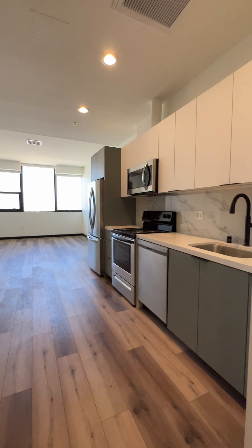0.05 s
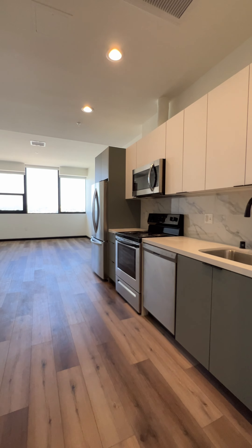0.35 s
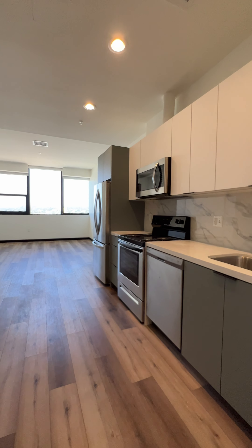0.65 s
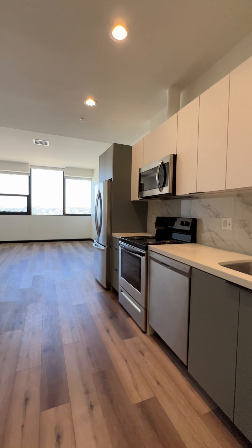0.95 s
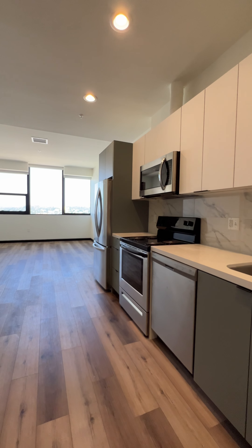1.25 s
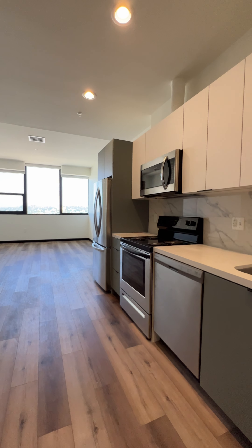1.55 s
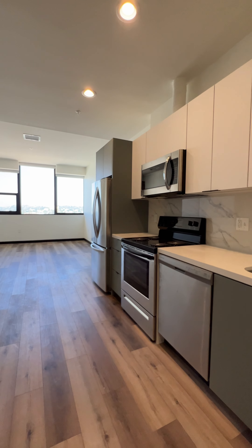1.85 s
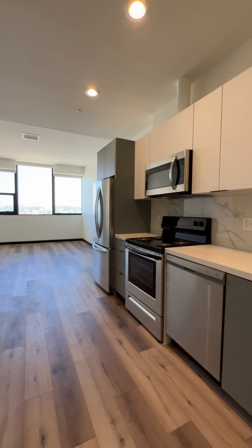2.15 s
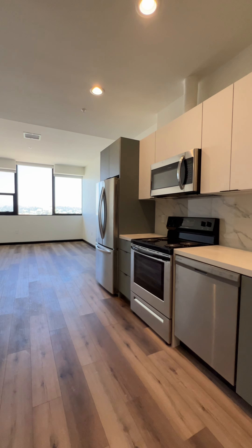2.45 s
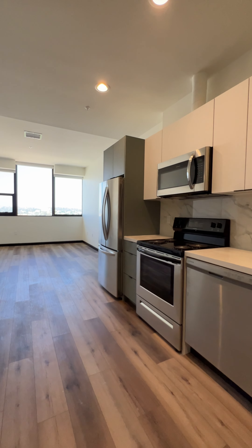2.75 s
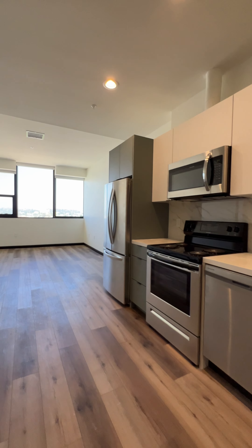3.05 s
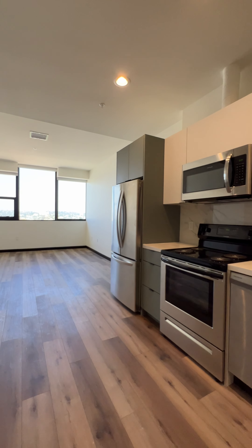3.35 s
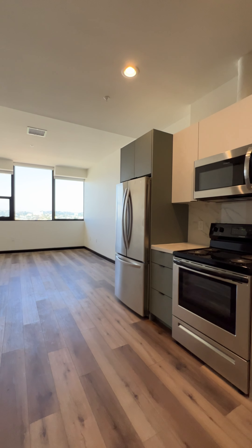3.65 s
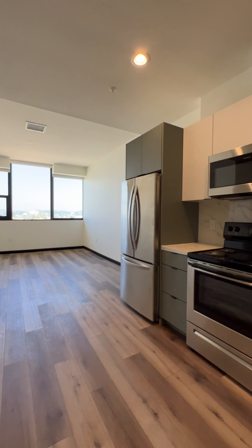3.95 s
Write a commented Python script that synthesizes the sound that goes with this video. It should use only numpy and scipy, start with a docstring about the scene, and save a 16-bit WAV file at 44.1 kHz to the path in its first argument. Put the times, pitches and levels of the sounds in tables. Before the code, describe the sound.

In an empty, echoing apartment, quiet footsteps cross a wooden floor while ventilation hums. Then a door closes loudly, away from the microphone: its panel knocks, the latch scrapes and snaps, and it settles with a thud.

```python
"""Soft footsteps and ticking boards sound in a bare apartment over a low ventilation drone.
Then, out of sight, what is probably a door swings shut: its panel knocks, its latch scrapes
and snaps, and the leaf settles with a boom. Each impact is a brief force, filtered by the struck
body; the door's modes ring on. Hard walls and floor reverberate for over a second after every blow."""
import sys
import numpy as np
from scipy import signal
from scipy.fft import rfft, irfft
from scipy.io import wavfile
from scipy.ndimage import uniform_filter1d

SR = 44100
rng = np.random.default_rng(int(sys.argv[2]) if len(sys.argv) > 2 else 0)


def dump_mix(stems):
    """Bounce the given channels to the path in sys.argv[1] as a 16-bit WAV at rate SR."""
    frames = np.atleast_2d(stems).T  # one column per channel
    limited = np.clip(frames, -1, 1)  # hard clip at full scale
    pcm = np.round(limited * 32767).astype(np.int16)
    wavfile.write(sys.argv[1], SR, pcm)


N = 176400
SIDES = np.array([[1], [-1]])  # left, right

# knocks on the panel; slams on the frame (time [s], level [dB], contact [s], tilt [dB/octave])
PANEL_KNOCKS = [(2.982, -15.5, 0.018, 4.5), (2.997, 0, 0.01, 1.67), (3.010, 1, 0.0023, .5),
                (3.396, -16, 0.033, 1)]
FRAME_SLAMS = [(3.725, -3.5, 0.021, 3), (3.738, -1.5, 0.0076, -2)]
# their spectra (frequency [Hz], level [dB])
KNOCK_SPECTRUM = [(40, -6), (90, -13.5), (140, 5), (255, -6), (355, 6.5), (510, -9.5), (820, -4.5),
                  (1000, -12.5), (1800, -24.5), (2800, -24), (4200, -40), (6500, -31), (12000, -39.5)]
SLAM_SPECTRUM = [(60, -12), (300, -8.5), (520, -2), (820, 0), (1300, -4.5), (1900, -14), (12000, -37)]
# pushes on the whole leaf (time [s], level [dB])
LEAF_PUSHES = [(3.390, -18), (3.520, -15.5), (3.676, 0), (3.719, 3.5), (3.773, -2)]
# modes of panel and leaf (frequency [Hz], level [dB], T60 [s])
PANEL_MODES = [(128.3, -5.5, 0.6), (140.7, 4.5, 0.52), (206, 2, 0.39), (348, -7, 1.1), (366, -3.5, 1.45),
               (553, -12, 0.4), (593, -1.5, 0.55), (683, 0, 0.59), (831, 1, 0.37), (920, -25, 0.52)]
LEAF_MODES = [(60, 6, 0.78), (70.7, 0, .68), (122.2, -2.5, 0.55)]
def door():
    """Impact excitation: the panel knocks and rings, then the leaf hits the frame and booms."""
    knock = amp(5.5) * room(blows(PANEL_KNOCKS, KNOCK_SPECTRUM), direct_db=-3, early_db=1.5)
    slam = amp(6.5) * room(blows(FRAME_SLAMS, SLAM_SPECTRUM), direct_db=-1.5, early_db=-4.5)
    panel = amp(-34.5) * ringing(PANEL_KNOCKS, PANEL_MODES)
    boom = amp(-28.5) * ringing(LEAF_PUSHES, LEAF_MODES)
    return knock + slam + panel + boom


# latch snaps; slides of the bolt (time [s], level [dB], contact [s], tilt [dB/octave])
LATCH_SNAPS = [(3.568, 1, .004, 2.3), (3.586, -17.5, 0.0014, 4.5), (3.613, -6, 0.0026, -1),
               (3.665, -6, 0.038, -2), (3.720, -5.5, 0.016, 2.5), (3.770, -6, 0.037, -4)]
BOLT_SLIDES = [(2.990, 3.5, 0.0032, -5), (3.417, 0.5, 0.0032, -1.5), (3.452, -4.5, 0.006, -4)]
# their spectra (frequency [Hz], level [dB])
SNAP_SPECTRUM = [(120, -5), (350, -1), (490, -4.5), (760, 0), (1150, -5.5), (1700, -7), (3380, -7),
                 (4500, -9), (6150, -8.5), (8000, -19), (12000, -25.5)]
SLIDE_SPECTRUM = [(600, 1.5), (2300, -8.5), (6000, -3.5), (12000, -17.5)]
# their resonances (frequency [Hz], bandwidth [Hz], gain [dB])
SNAP_PEAKS = [(1224, 240, 7.5), (2405, 290, 7), (3460, 460, 8)]
SLIDE_PEAKS = [(4250, 400, 5.5), (5350, 490, 8.5)]
# modes of the latch metal (frequency [Hz], level [dB], T60 [s])
METAL_MODES = [(1170, -1, 1.8), (1251, 0, 1.8), (1378, -4, 1.4), (1410, -4, 1.4), (2182, 0, 1.2),
               (2353, -2, 1.4), (3300, -4, 1.6), (3391, 2, 1.4), (3607, -3, 1.2), (6029, -6, 1.)]
def latch():
    """Friction and impact: the bolt slides over its plate and snaps; lightly damped metal rings on."""
    snaps = blows(LATCH_SNAPS, SNAP_SPECTRUM, SNAP_PEAKS, ripple_db=2.5)
    snaps = amp(8.5) * room(snaps, direct_db=-13, early_db=-7.5)
    slides = blows(BOLT_SLIDES, SLIDE_SPECTRUM, SLIDE_PEAKS, ripple_db=2.5)
    slides = amp(-1) * room(slides, direct_db=-11, early_db=-6)
    return snaps + slides + amp(-42.5) * ringing(LATCH_SNAPS, METAL_MODES)


# footfalls; board ticks (time [s], level [dB], contact [s], centre [Hz], roll-off [dB/octave])
FOOTFALLS = [(.03, 2.5, 0.0092, 154, 13.5), (.505, -5, 0.0058, 176, 15), (0.538, -10.5, 0.0039, 617, 28),
             (0.733, -10, 0.0028, 520, 13), (1.61, -4.5, 0.0046, 640, 13.5), (1.848, -12, 0.005, 566, 11),
             (2.444, 3.5, 0.0087, 169, 15), (2.447, -8, 0.011, 524, 21), (2.728, -1.5, 0.0042, 574, 12.5),
             (2.731, -1.5, 0.0033, 172, 8)]
BOARD_TICKS = [(0.687, -17, 0.0069, 2660, 12.5), (1.598, -21.5, 0.00098, 2600, 19)]
def steps():
    """Compliant contact: soft soles give little treble, while nearby boards tick crisply."""
    soles = signal.sosfilt(signal.butter(2, 4930, fs=SR, output="sos"), taps(FOOTFALLS))
    soles = room(soles, direct_db=-13, early_db=1)
    boards = room(taps(BOARD_TICKS), direct_db=-0.5, early_db=0.5)
    return amp(-18) * (soles + boards)


def taps(rows):
    """Band-pass response: each light contact has one broad spectral peak."""
    out = 0
    for start, db, length, centre, slope in rows:
        spectrum = [(centre * 2. ** octave, -abs(octave) * slope) for octave in (-5, 0, 5)]
        out = out + blows([(start, db, length, 0)], spectrum)
    return out


def blows(rows, spectrum, peaks=(), ripple_db=0, size=8192):
    """Source and filter: the struck body's resonances colour every contact force."""
    out, hz = np.zeros(N + size), bins(size)
    ripple = unit(uniform_filter1d(rng.standard_normal(len(hz)), size=24))  # lesser resonances
    body_db = along(spectrum, hz) + resonances(peaks, hz) + ripple_db * ripple * np.minimum(hz / 3000, 1)
    octaves = np.log2(np.maximum(hz, spectrum[0][0]))
    for start, db, length, tilt in rows:
        blow = irfft(contact(length, size) * minimum_phase(body_db + tilt * octaves))
        i = int(start * SR)
        out[i:i + size] += amp(db) * unit(blow) / np.sqrt(size)
    return out[:N]


def contact(length, size):
    """Rough contact: a decaying crowd of tiny impacts has a nearly flat spectrum."""
    fade = np.exp(-np.arange(size) / SR / max(length, 1 / SR))
    force = rng.standard_normal(size) * fade
    for _ in range(2):
        whitened = irfft(np.exp(1j * np.angle(rfft(force))))
        force = whitened * np.sqrt(fade)
    return rfft(force)


def ringing(rows, modes):
    """Free vibration: each blow starts damped modes; higher ones reach the two sides out of phase."""
    out, t = np.zeros((2, 2 * N)), np.arange(N) / SR
    ring = 0
    for hz, db, t60 in modes:
        phase_gap = np.arccos(np.clip(along(COHERENCE, hz), -1, 1))
        wave = np.sin(2 * np.pi * hz * t + SIDES * phase_gap / 2) * decay(t, t60)
        ring = ring + amp(db) * balance(hz) * wave
    for start, db, *_ in rows:
        i = int(start * SR)
        out[:, i:i + N] += amp(db) * ring
    return out[:, :N]


# reverberation time (frequency [Hz], T60 [s])
REVERB_TIMES = [(60, 1.08), (250, 1.34), (700, 1.17), (2400, 1.76), (5500, 1.15), (8500, 1.05),
                (12000, 0.63)]
def room(x, direct_db, early_db, early_s=0.019, left_lag_s=.00012):
    """Reverberation: direct sound, early reflections and a diffuse tail decaying band by band."""
    t, hz = np.arange(N) / SR, bins(N)
    field, tail = rfft(diffuse()), 0
    for centre, t60 in REVERB_TIMES:
        band = along([(f, f == centre) for f, _ in REVERB_TIMES], hz)
        tail = tail + irfft(field * band, N) * decay(t, t60)
    early = amp(early_db) * unit(diffuse() * np.exp(-t / early_s))
    response = (unit(tail) + early) / np.sqrt(N)
    response[[0, 1], [int(left_lag_s * SR), 0]] += amp(direct_db)
    return signal.fftconvolve(x[None], response, axes=1)[:, :N]


# spectra of rumble and hiss (frequency [Hz], level [dB])
RUMBLE_SPECTRUM = [(25, -9), (55, -4), (135, -8), (230, -3.5), (400, -16.5), (700, -19), (1100, -33),
                   (2400, -36), (5600, -51.5), (12000, -55.5)]
HISS_SPECTRUM = [(400, 11.5), (1500, 1.5), (2500, -1), (4700, -5.5), (5800, -1.5), (7500, -12),
                 (10300, -20.5), (12000, -15)]
# low room resonances (frequency [Hz], bandwidth [Hz], gain [dB])
ROOM_PEAKS = [(150.7, 21, 4.5), (237, 7.6, 7.5)]
# envelopes of hiss and drone (time [s], level [dB])
HISS_LEVELS = [(0, 2), (.17, -3.5), (.35, 0), (.95, 2), (1.15, -1.5), (1.33, -8), (1.66, -5), (1.76, 1),
               (2.2, 1), (2.44, -3), (2.9, 2.5)]
DRONE_LEVELS = [(0, 3), (.4, -6), (.7, -3), (.92, 4), (1.09, -2.5), (1.23, 7), (1.4, 2), (1.7, -9),
                (1.88, 6), (1.98, -2), (2.5, 0), (2.9, -4.5)]
def background(drone_hz=191.7, waver_hz=1.2, mains_hz=60):
    """Forced resonance: ventilation rumbles in the room's low modes and drones.
    The mains hum, and a separate faint hiss swells and fades."""
    t, hz = np.arange(N) / SR, bins(N)
    rumble = amp(-53.5) * diffuse(along(RUMBLE_SPECTRUM, hz) + resonances(ROOM_PEAKS, hz))
    hiss = amp(-64.5) * swell(HISS_LEVELS) * diffuse(along(HISS_SPECTRUM, hz))
    waver = unit(uniform_filter1d(rng.standard_normal(N), size=SR // 10))
    tone = unit(np.sin(2 * np.pi * np.cumsum(drone_hz + waver_hz * waver) / SR))
    drone = amp(-54.5) * swell(DRONE_LEVELS) * balance(drone_hz) * tone
    hum = amp(-61.5) * unit(np.sin(2 * np.pi * mains_hz * t))
    return rumble + hiss + drone + hum


# likeness of left and right (frequency [Hz], correlation before clipping [1])
COHERENCE = [(190, 1.3), (380, 0.76), (650, -0.12), (1100, 0.08), (2200, 0.24), (4500, -0.01), (8000, 0.29)]
def diffuse(db=0):
    """Diffuse field: noise at two close points is alike in the bass, nearly unrelated higher up."""
    hz = bins(N)
    correlation = np.clip(along(COHERENCE, hz), -.9, .999)
    mid, side = rfft(rng.standard_normal((2, N)))
    pair = mid * np.sqrt(1 + correlation) + SIDES * side * np.sqrt(1 - correlation)
    return unit(irfft(pair * balance(hz) * amp(db), N))


# stereo balance (frequency [Hz], left minus right [dB])
BALANCE = [(60, 0.5), (180, -2.73), (400, -2), (800, -2.5), (1600, 0.8), (8000, 0.5)]
def balance(hz):
    """Level difference, split evenly into left and right gains."""
    return amp(SIDES * along(BALANCE, hz) / 2)


def minimum_phase(db):
    """Causality: folding the cepstrum gives the minimum-phase filter for these gains."""
    cepstrum = irfft(db * np.log(10) / 20)
    half = len(cepstrum) // 2
    cepstrum[1:half] *= 2
    cepstrum[half + 1:] = 0
    return np.exp(rfft(cepstrum))


def resonances(peaks, hz):
    """Lorentzian peaks, summed in dB."""
    return sum(db / (1 + (2 * (hz - centre) / width) ** 2) for centre, width, db in peaks)


def decay(t, t60):
    """Exponential damping: 60 dB in t60 seconds."""
    return np.exp(-np.log(1000) * t / t60)


def swell(curve):
    """Amplitude envelope of rms 1 from (time [s], level [dB])."""
    return unit(amp(np.interp(np.arange(N) / SR, *np.array(curve).T)))


def along(points, hz):
    """Interpolation on a log-frequency axis."""
    freqs, values = np.array(sorted(points), float).T
    return np.interp(np.log(hz), np.log(freqs), values)


def bins(size):
    """Fourier frequencies, at least 1 Hz."""
    return np.maximum(np.fft.rfftfreq(size, 1 / SR), 1)


def amp(db):
    """Decibels to gain."""
    return 10 ** (np.asarray(db) / 20)


def unit(x):
    """Normalisation to rms 1."""
    return x / np.sqrt(np.mean(x ** 2))


def scene():
    """Superposition: all sources add in two channels."""
    return background() + door() + latch() + steps()


def record(dry):
    """Band limiting: the microphone passes 34 Hz to 12 kHz."""
    x = signal.sosfilt(signal.butter(2, 34, "high", fs=SR, output="sos"), dry)
    return signal.sosfilt(signal.ellip(10, .2, 80, 12000, fs=SR, output="sos"), x)


dry = scene()
out = record(dry)
dump_mix(out)
```